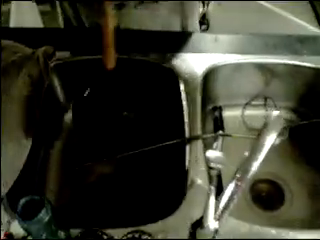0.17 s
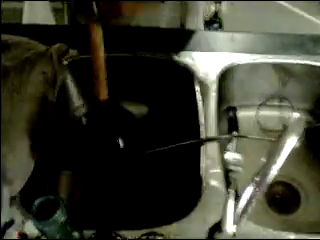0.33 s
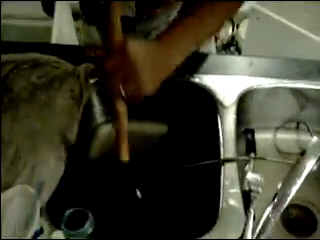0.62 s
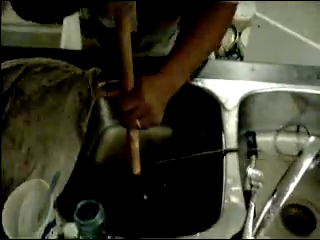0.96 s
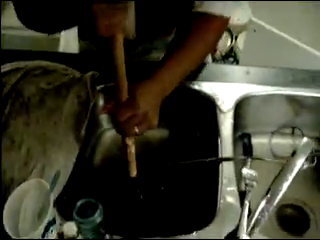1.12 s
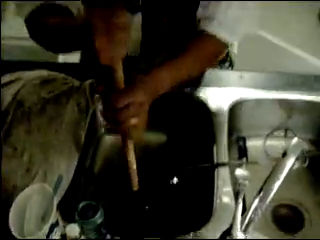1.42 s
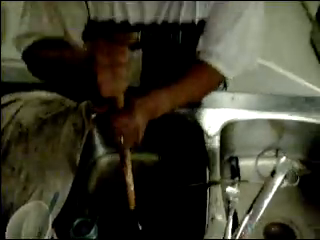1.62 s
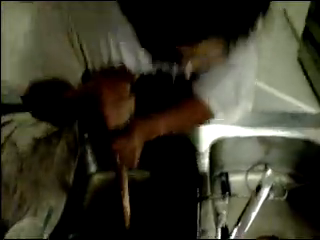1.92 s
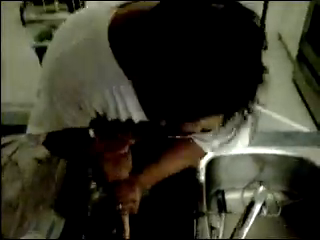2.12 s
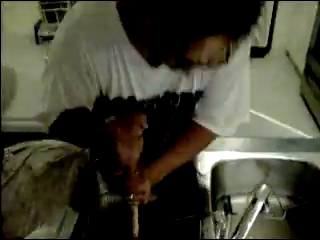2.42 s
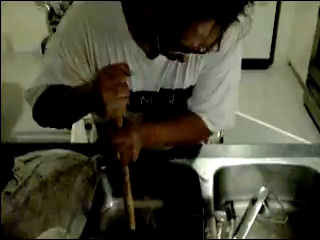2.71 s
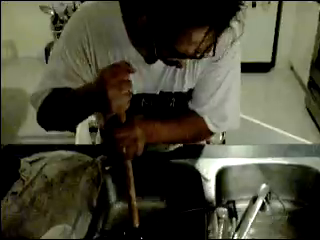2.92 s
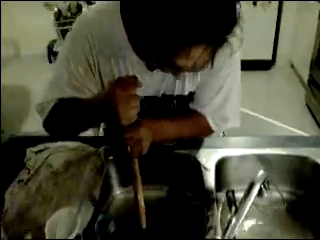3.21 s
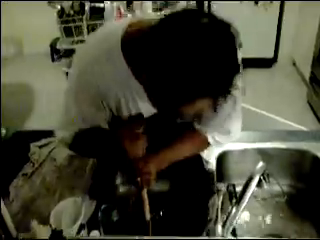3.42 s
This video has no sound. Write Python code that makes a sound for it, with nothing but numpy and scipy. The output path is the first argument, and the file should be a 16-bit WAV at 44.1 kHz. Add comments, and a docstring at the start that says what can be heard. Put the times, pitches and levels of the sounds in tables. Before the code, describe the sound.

Sink plunging in a small echoing kitchen: quiet room noise, light watery plinks, then strong splashing gulps with bubbles at irregular strokes, the last one deeper, heard close through a dull small microphone.

```python
"""Room hiss and a refrigerator's hum come first; then a rubber plunger is worked in a steel sink of water.
Splashes are clouds of small bubbles: random clicks ringing resonators, brighter or duller each time.
Single bubbles plink as dying sines of gliding pitch; gulps of air under the cup are clouds of large bubbles.
The steel basin rings along, the kitchen echoes, and a small microphone cuts the top."""
import sys
import numpy as np
from scipy import signal
from scipy.fft import rfft, irfft, next_fast_len
from scipy.io import wavfile

SR = 44100
rng = np.random.default_rng(int(sys.argv[2]) if len(sys.argv) > 2 else 0)


def file_out(sig):
    """Save sig as 16-bit WAV at sys.argv[1]."""
    # one column per channel
    cols = np.atleast_2d(sig).T
    # limit, then scale
    lim = np.clip(cols, -1, 1)
    pcm = np.round(lim * 32767).astype(np.int16)
    wavfile.write(sys.argv[1], SR, pcm)


N = 156996


def from_db(db):
    """dB to amplitude gain; from_db(2 * db) is the power gain."""
    return 10 ** (np.asarray(db) / 20)


def rms_one(x):
    """Scale to rms 1."""
    return x / np.sqrt(np.mean(x ** 2) + 1e-20)


def at_hz(points, hz):
    """Read a spectrum table on a log-frequency axis."""
    table_hz, table_db = np.array(points).T
    return np.interp(np.log(hz), np.log(table_hz), table_db)


def resonance(x, hz, width_hz):
    """Two-pole band-pass, gain 1 on top."""
    r = np.exp(-np.pi * width_hz / SR)
    numerator = np.array([1, 0, -1]) * (1 - r * r) / 2
    return signal.lfilter(numerator, [1, -2 * r * np.cos(2 * np.pi * hz / SR), r * r], x)


def low_pass(x, hz):
    """Second-order Butterworth low-pass."""
    return signal.sosfilt(signal.butter(2, hz, fs=SR, output="sos"), x)


def flutter(rate_hz, size):
    """Low-passed noise of rms 1, for irregular level changes."""
    return rms_one(low_pass(rng.standard_normal(size), rate_hz))


def evened(colour_db):
    """Shift each dB pattern so that its mean power is 1."""
    mean_power = np.mean(from_db(2 * colour_db), axis=-1, keepdims=True)
    return colour_db - 10 * np.log10(mean_power)


# Broad room noise. Each row: frequency in Hz, relative density in dB per Hz.
ROOM_SPECTRUM = [(7.1, -27.5), (12, -11), (18, -12.5), (27, -34.5), (56, -30.5), (81, -40), (115, -28),
                 (146, -32), (217, -30), (389, -34), (481, -36), (756, -34), (1130, -40), (2850, -44.5),
                 (6850, -51), (8900, -81.5), (15100, -120)]
ROOM_DB = -45.5
# Humps of the appliance noise. Each row: centre in Hz, width in Hz, rms level in dB.
APPLIANCE_HUMPS = [(24.2, 10, -61), (44.2, 11, -54.5), (76, 9.8, -60.5), (760, 60, -57), (634, 90, -63.5),
                   (390, 23, -66), (1420, 160, -63)]


def room_noise():
    """Broad hiss and rumble from shaped noise, plus humps of noise through two resonances each."""
    size = next_fast_len(N)
    hz = np.maximum(np.arange(size // 2 + 1) * SR / size, 1)
    gain = from_db(at_hz(ROOM_SPECTRUM, hz)) * (hz > 5)
    broad = irfft(rfft(rng.standard_normal(size)) * gain, size)[:N]
    out = from_db(ROOM_DB) * rms_one(broad)
    white = rng.standard_normal(N + SR)
    for centre_hz, width_hz, db in APPLIANCE_HUMPS:
        hump = resonance(resonance(white, centre_hz, width_hz), centre_hz, width_hz)
        out += from_db(db) * rms_one(hump[SR:])  # skip the onset
    return out


# Refrigerator tones. Each row: frequency in Hz, rms level in dB before waver.
HUM_TONES = [(60, -57.5), (96, -62.5), (120.5, -61.5), (180, -64), (224, -59), (269, -65.5), (314, -64.5),
             (359, -70), (448, -66)]
MAX_WAVER_HZ, WAVER_DB = 3.7, 1.5


def refrigerator():
    """Steady tones, each wavering in level at its own slow rate."""
    t = np.arange(N) / SR
    out = np.zeros(N)
    for hz, db in HUM_TONES:
        rate, waver_phase, tone_phase = rng.uniform(0, 1, 3)
        waver_db = WAVER_DB * np.sin(2 * np.pi * (MAX_WAVER_HZ * rate * t + waver_phase))
        tone = np.sin(2 * np.pi * (hz * t + tone_phase))
        out += np.sqrt(2) * from_db(db + waver_db) * tone
    return out


def envelopes(rows):
    """Power envelopes on a 1 ms grid: linear amplitude rise, hold, exponential release."""
    t = np.arange(0, N / SR + .001, .001)
    start, db, _, rise, hold, t60 = np.transpose(rows)[:, :, None]
    attack = np.clip((t - start) / rise, 0, 1)
    release_s = np.maximum(t - start - rise - hold, 0)
    return t, (attack * from_db(db - 60 * release_s / t60)) ** 2


SIZE_SPREAD_DB = 2
CLUMP_DB, CLUMP_HZ = 2.5, 300


def bubble_cloud(rows, pitches_hz, colour_db, per_s, cycles):
    """Random collapses dealt to bubble sizes; each size rings for `cycles` periods (to -60 dB)."""
    t, power = envelopes(rows)
    sizes_db = SIZE_SPREAD_DB * np.minimum(rng.exponential(1, N), 4)
    sizes = from_db(sizes_db) * rng.choice([-1, 1], N)
    clumping = from_db(CLUMP_DB * flutter(CLUMP_HZ, N))
    clicks = rms_one(sizes * clumping * (rng.random(N) < per_s / SR))
    dealt = rng.integers(0, len(pitches_hz), N)
    out = np.zeros(N)
    for k, hz in enumerate(pitches_hz):
        size_power = from_db(2 * colour_db[:, k]) @ power
        level = np.interp(np.arange(N) / SR, t, np.sqrt(size_power))
        width_hz = 2.2 * hz / cycles
        struck = clicks * (dealt == k) * level + 1e-18  # avoids denormals
        out += np.sqrt(SR / np.pi / width_hz) * resonance(struck, hz, width_hz)
    return out


# Each row: start in seconds, level in dB, tilt in dB per octave, rise in s, hold in s, t60 in s.
SPLASH_EVENTS = [(0.88, -54, 1, 0.037, .01, .2), (0.899, -47.5, 0.5, .005, 0.017, .2),
                 (0.94, -50.5, 1.5, .005, 0.014, 0.62), (1.038, -52.5, 1, .01, 0.017, .2),
                 (1.077, -49, -3, 0.013, 0.031, 0.28), (1.396, -43, 12, .003, .008, 0.054),
                 (1.403, -46, -2, .003, .01, .08), (1.482, -45.5, 4, 0.0095, .005, 0.079),
                 (1.537, -50, -4.5, .003, .008, .08), (1.973, -42.5, -1.5, .002, 0.026, 0.11),
                 (2.05, -44, -2.5, .003, 0.017, .2), (2.067, -35.5, 4.5, 0.012, 0.014, 0.1),
                 (2.113, -41, 1.5, .004, .012, 0.14), (2.164, -40, 3, 0.0028, 0.02, 0.21),
                 (2.21, -48, 0.5, 0.0063, 0.022, 0.98), (2.305, -42, 1, .002, 0.0061, .07),
                 (2.482, -48.5, 2, .004, 0.014, 0.21), (2.575, -35.5, -0.5, .002, 0.013, 0.29),
                 (2.633, -32.5, 0, .002, .01, 0.12), (2.647, -33.5, 1, .005, 0.013, 0.13),
                 (2.69, -43.5, 0, 0.0087, 0.037, 0.93), (2.733, -50, 5, .002, .006, .1),
                 (3.224, -47.5, 5, .002, 0.0025, .04), (3.295, -43, -2.5, 0.02, .02, 0.24),
                 (3.378, -44, -3, .022, 0.045, 0.27), (3.477, -45.5, -4, .005, 0.015, 0.14),
                 (3.519, -42.5, -1.5, 0.0035, .05, .2), (3.53, -45, 0, .015, 0.034, .2)]
# Colour common to all splashes. Each row: frequency in Hz, relative density in dB per Hz.
SPLASH_SPECTRUM = [(290, -33), (500, -7), (954, -1), (2010, -6), (2470, -5), (3220, -7.5), (3470, -6),
                   (3790, -18), (6850, -16.5), (8900, -50), (15100, -120)]
SPRAY_PER_S, SPRAY_CYCLES = 5000, 7.3


def splashes():
    """Fine bubbles and spray, brighter or duller from splash to splash."""
    hz = np.geomspace(550, 6800, num=20)
    band_db = at_hz(SPLASH_SPECTRUM, hz) + 10 * np.log10(hz)  # bands widen with pitch
    tilt_db = np.outer(np.array(SPLASH_EVENTS)[:, 2], np.log2(hz / 2000))
    return bubble_cloud(SPLASH_EVENTS, hz, evened(band_db + tilt_db), SPRAY_PER_S, SPRAY_CYCLES)


# Each row: resonance in Hz, width in Hz, gain in dB.
BASIN_MODES = [(320, 13, -6.5), (765, 23, -1), (1040, 40, -13.5), (2600, 46, -9.5)]


def basin(churn):
    """The steel basin rings along at its resonances."""
    return sum(from_db(db) * resonance(churn, hz, width_hz) for hz, width_hz, db in BASIN_MODES)


KITCHEN_T60_S, WALL_CUT_HZ, KITCHEN_DB = 0.26, 3500, -15.5


def kitchen(x):
    """Eight feedback delays of alternating sign, duller on every round."""
    size = next_fast_len(N + SR)
    w = 2 * np.pi * np.arange(size // 2 + 1) / size
    dull = 1 / (1 + 1j * w * SR / (2 * np.pi * WALL_CUT_HZ))
    delays_s = [.0071, .0097, .0131, .0167, .0203, .0239, .0283, .0331]
    response = 0
    for k, delay_s in enumerate(delays_s):
        loop = from_db(-60 * delay_s / KITCHEN_T60_S) * dull * np.exp(-1j * w * delay_s * SR)
        response = response + (-1) ** k * loop / (1 - loop)
    return from_db(KITCHEN_DB) * irfft(rfft(x, size) * response, size)[:N]


# Each row: start in seconds, level in dB, starting pitch in Hz, t60 in s,
# climb as a fraction of the pitch per cycle at first (negative falls).
BUBBLE_EVENTS = [(0.905, -45, 2940, .05, 0), (1.032, -45, 1420, 0.15, 0.005),
                 (1.42, -43, 1200, 0.035, -0.0099), (1.806, -41, 926, 0.038, 0),
                 (1.354, -35, 1037, 0.023, 0.0018), (1.409, -37, 1980, 0.04, -0.0059),
                 (1.402, -45, 4680, .03, -0.0075), (1.496, -46, 4300, .02, 0),
                 (1.496, -40, 963, .05, 0.0061), (1.547, -40.5, 2020, 0.034, -0.0083),
                 (1.788, -37, 829, .07, 0.013), (1.979, -31.5, 1164, 0.099, .03),
                 (1.983, -35.5, 2600, 0.069, -0.0016), (2.068, -22, 333, .09, -0.00026),
                 (2.071, -22.5, 180, 0.13, .01), (2.082, -26, 484, 0.07, 0.0044),
                 (2.086, -29.5, 3190, 0.069, 0.0069), (2.087, -37, 5040, .025, 0),
                 (2.088, -35.5, 1032, 0.068, 0.011), (2.103, -34.5, 1080, 0.075, 0.0091),
                 (2.106, -30, 203, 0.13, 0.071), (2.119, -36, 3500, 0.05, 0.014),
                 (2.158, -35.5, 482, 0.18, 0), (2.163, -36, 1040, .07, -0.0049),
                 (2.164, -34.5, 3320, 0.047, -0.0024), (2.175, -35, 2800, .06, 0.0051),
                 (2.188, -36, 1405, 0.1, -0.0064), (2.189, -33.5, 2280, .05, 0.0064),
                 (2.209, -34, 1040, 0.041, .003), (2.303, -33, 1220, 0.053, .05),
                 (2.307, -40, 1900, .03, 0.027), (2.31, -43, 2800, 0.023, -0.0064),
                 (2.318, -47, 5580, .02, 0), (2.316, -49, 1040, 0.03, 0.025), (2.494, -44, 4100, .03, 0),
                 (2.581, -35.5, 3170, 0.1, -0.0025), (2.587, -30.5, 845, 0.091, 0.019),
                 (2.593, -33, 352, .08, 0.02), (2.601, -31, 232, 0.15, 0.013),
                 (2.614, -36, 760, .05, 0.034), (2.635, -24, 2400, 0.037, 0.015),
                 (2.637, -37, 5600, .025, 0), (2.638, -31.5, 560, .08, 0.022),
                 (2.642, -27.5, 332, 0.13, -0.0058), (2.645, -38.5, 172, 0.24, 0.028),
                 (2.647, -28, 960, .05, 0.0049), (2.657, -30, 3700, 0.036, 0.004),
                 (2.662, -36, 1370, 0.058, 0.01), (2.668, -38, 2450, .04, 0.0052),
                 (2.672, -30.5, 916, 0.046, -0.013), (2.689, -38, 1800, .04, -0.058),
                 (2.845, -42.5, 1040, 0.038, -0.0058), (2.9, -37, 2690, 0.042, 0.009),
                 (3.229, -46.5, 5600, .02, -0.0026), (3.229, -32, 2420, 0.023, .002),
                 (3.325, -25.5, 304, .07, 0), (3.333, -33.5, 1270, 0.037, 0.0072),
                 (3.347, -32.5, 303, 0.089, 0), (3.387, -32.5, 345, 0.087, 0.02),
                 (3.396, -36.5, 1443, 0.077, 0.0027), (3.402, -34, 724, 0.086, 0.0049),
                 (3.406, -23.5, 214, 0.14, -0.0049), (3.41, -28.5, 320, 0.074, 0.059),
                 (3.417, -35, 765, 0.14, 0.0015), (3.439, -30.5, 287, 0.09, 0.013),
                 (3.445, -36.5, 1230, 0.049, 0.0043), (3.446, -42, 1890, 0.037, 0.026),
                 (3.467, -35, 159, 0.13, 0.0065), (3.477, -32.5, 390, 0.07, .01),
                 (3.486, -31.5, 94, 0.18, -0.0085), (3.485, -31, 267, 0.088, 0.0034),
                 (3.521, -32, 970, 0.041, .003), (3.522, -29, 1495, 0.031, 0), (3.532, -35, 2270, 0.026, 0),
                 (3.534, -28.5, 1087, 0.03, 0.0037)]
ATTACK_CYCLES, CLIMB_CYCLES = 0.87, 8
WOBBLE, WOBBLE_HZ = .3, 200  # full depth from 1 kHz up


def bubbles():
    """Each bubble is a dying, unsteady sine whose pitch glides over its first cycles, then settles."""
    out = np.zeros(N + SR)
    t = np.arange(SR // 4) / SR
    for start_s, db, hz, t60, climb in BUBBLE_EVENTS:
        cycles = hz * t
        settling = CLIMB_CYCLES * (1 - np.exp(-cycles / CLIMB_CYCLES))
        gained = climb * CLIMB_CYCLES * (cycles - settling)
        wobble = 1 + WOBBLE * np.minimum(hz / 1000, 1) * flutter(WOBBLE_HZ, len(t))
        envelope = from_db(db - 60 * t / t60) * np.minimum(cycles / ATTACK_CYCLES, 1)
        i = int(start_s * SR)
        out[i:i + len(t)] += envelope * wobble * np.sin(2 * np.pi * (cycles + gained))
    return out[:N]


# Each row: start in seconds, level in dB, centre in Hz, rise in s, hold in s, t60 in s.
GULP_EVENTS = [(2.04, -42, 300, 0.0044, .012, .1), (2.074, -35.5, 300, .01, 0.03, 0.08),
               (2.122, -58, 283, 0.0035, .015, .15), (2.167, -49.5, 222, .005, 0.018, 0.18),
               (2.588, -40, 450, .008, 0.041, 0.17), (2.644, -40, 350, 0.0062, 0.027, 0.18),
               (3.305, -47, 232, .01, 0.016, 0.13), (3.385, -40.5, 300, 0.011, 0.094, .2),
               (3.427, -48, 80, 0.011, .03, .2), (3.504, -52, 280, .005, 0.014, 0.28),
               (3.548, -45, 154, .008, .02, .1)]
GULP_PER_S, GULP_CYCLES, GULP_WIDTH_OCT, GULP_TOP_HZ = 1500, 8, 0.87, 704


def gulps():
    """Large air pockets, sizes spread round the centre pitch of each gulp, muffled by the water."""
    hz = np.geomspace(70, 800, num=12)
    octaves_off = np.log2(hz / np.array(GULP_EVENTS)[:, 2:3])
    colour_db = -6 * (octaves_off / GULP_WIDTH_OCT) ** 2
    cloud = bubble_cloud(GULP_EVENTS, hz, evened(colour_db), GULP_PER_S, GULP_CYCLES)
    return low_pass(cloud, GULP_TOP_HZ)


def scene():
    """Water in the sink with its room, over the background."""
    background = room_noise() + refrigerator()
    churn = splashes() + gulps()
    water = churn + basin(churn) + bubbles()
    return (background + water + kitchen(water))[None, :]


OFFSET, STOPBAND_HZ = -.0688, 7180  # offset as a fraction of full scale


def record(dry):
    """The top is cut steeply, 70 dB down; the converter sits on a constant offset."""
    steep_cut = signal.cheby2(30, 70, STOPBAND_HZ, fs=SR, output="sos")
    return OFFSET + signal.sosfilt(steep_cut, dry)


dry = scene()
out = record(dry)
file_out(out)
```